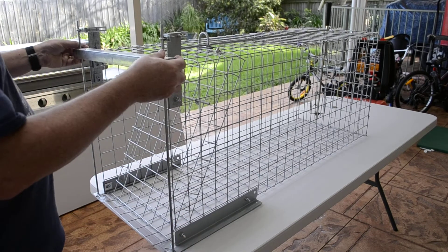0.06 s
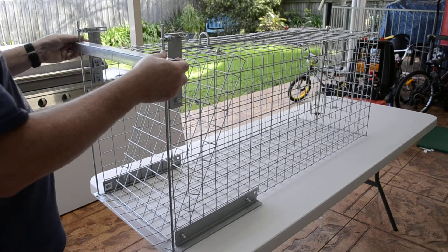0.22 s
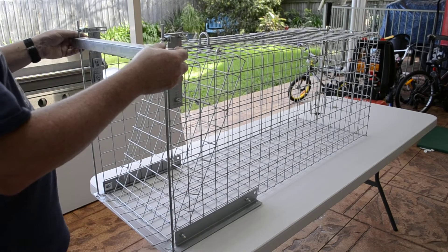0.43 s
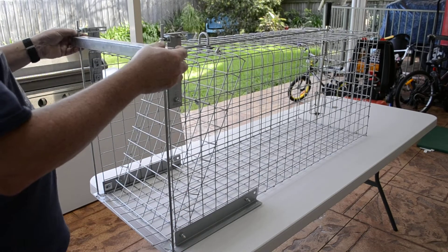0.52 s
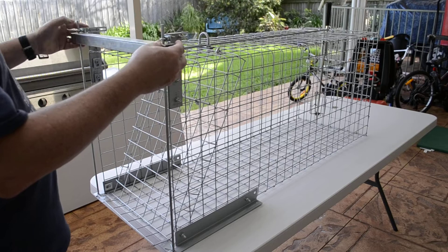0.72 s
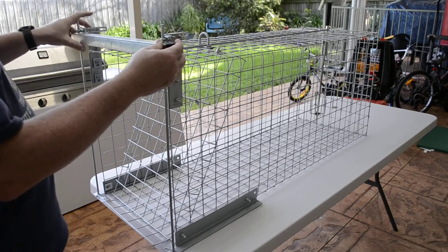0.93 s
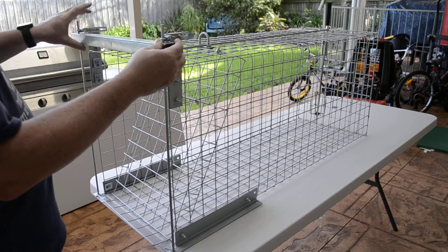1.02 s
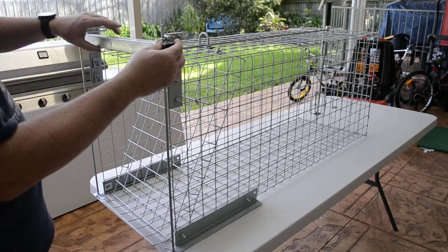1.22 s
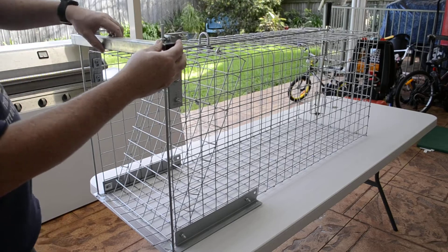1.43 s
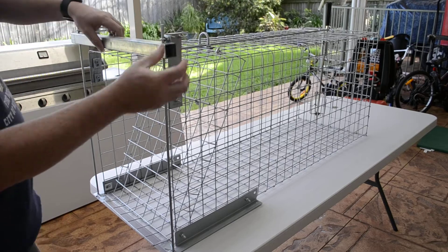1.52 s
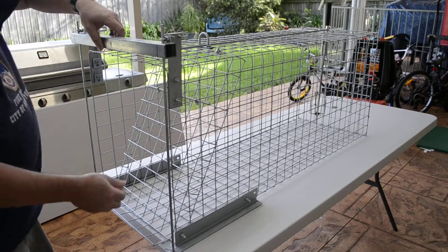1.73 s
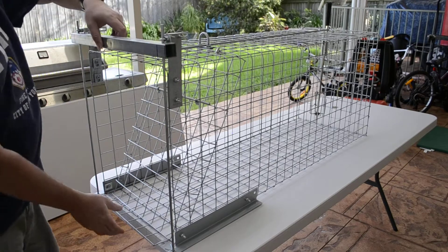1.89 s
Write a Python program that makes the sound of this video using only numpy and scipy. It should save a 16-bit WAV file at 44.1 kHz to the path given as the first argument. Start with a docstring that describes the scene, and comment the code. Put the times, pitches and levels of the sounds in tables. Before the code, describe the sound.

A metal bar clinks against a wire cage at about 0.2 seconds and scrapes along its frame in short pushes. At 0.6 seconds it seats with a hard clack, and the mesh rattles and rings briefly. A light tick and scrape come near 0.9 seconds, a softer second clack at 1.5, and a faint scrape near 1.9. The handling is close, over a soft outdoor rush.

```python
"""Under a patio roof, one microphone near a wire cage. A metal bar is slid into the door frame:
it clinks on a bracket, scrapes along and seats with two hard clacks that set frame and mesh ringing.
Handling adds small ticks, and the friction draws a faint boom from the table under the cage.
Farther off lie a soft outdoor rush, a low drone and one thin, high bird note."""
import sys
import numpy as np
from scipy import signal
from scipy.fft import rfft, irfft, next_fast_len
from scipy.io import wavfile
from scipy.ndimage import map_coordinates

SR = 44100
rng = np.random.default_rng(int(sys.argv[2]) if len(sys.argv) > 2 else 0)


def unload_audio(sound):
    """Save the sound as a 16-bit wav file, at the path given as the first command line argument."""
    columns = np.transpose(np.atleast_2d(sound))
    # keep every value between -1 and 1, then stretch to whole-number steps
    steps = np.round(np.clip(columns, -1, 1) * 32767)
    wavfile.write(sys.argv[1], SR, steps.astype(np.int16))


N = 85995

# the bar seats: start_s, mesh_db, crack_db, ring_db, struck_end (0 near, 1 far), mesh_tilt_db_per_octave
SEATINGS = [(.5832, -30, -25.3, -37.3, 0, 0), (1.5192, -35, -31, -43, 1, -.5)]
# contacts within one clack: delay_s, level_db
CLACK_CONTACTS = [(0, -3), (.0062, -2)]
# crack of the bar landing: frequency_hz, density_db
CRACK_SPECTRUM = [(60, -35), (150, -14), (520, 0), (1300, -2), (2300, -2), (3300, -6), (4400, 0),
                  (5900, -6), (7100, -1), (7850, -9), (9300, 1), (10500, -4), (11300, -13), (14000, -55)]
# modes of bar and frame, by the end struck: pitch_hz, near_end_db, far_end_db
FRAME_MODES = [(236, -6, -9), (289, -7, -2), (478, -6, -1), (531, -4, -4), (596, -4, -13), (742, -4, -2),
               (1183, -4, 3), (1262, 1, 0), (1609, -5, -9), (2152, 0, -16), (2276, -6, -9), (2328, -5, -5),
               (2825, -2, -4), (2916, -6, 0), (3909, -8, -7), (4177, -7, -7), (4405, 5, -1),
               (4958, -9, -18), (5150, -3, -10), (5345, -1, -6), (5620, -6, -4), (5891, -6, -15),
               (6414, -9, -6), (6504, -9, -9), (7102, -6, -5), (7576, -11, -11), (8153, -9, -22),
               (8247, -12, -20), (8312, -15, -13), (8549, -14, -19), (8874, -9, -25), (9122, -9, -18),
               (9220, -11, -16), (10384, -16, -19)]
# ring time of bar and frame: frequency_hz, t60_s
FRAME_DECAY = [(130, 0.37), (500, 0.69), (1200, 0.47), (3000, 0.6), (5000, 0.32), (10000, 0.41)]
# dense ringing of the mesh: frequency_hz, density_db
MESH_SPECTRUM = [(35, -84), (60, -74), (121, -2.5), (161, -21.5), (238, -5.5), (421, -10.5), (597, -1),
                 (637, -9), (759, -2.5), (1010, -5.5), (1200, -1), (1400, -5.5), (2120, -7), (3590, -9),
                 (4370, -5.5), (4770, -13), (5210, -11), (9200, -19), (11200, -24), (14600, -65),
                 (22000, -120)]
# ring time of the mesh: frequency_hz, t60_s
MESH_DECAY = [(130, 1.0), (500, 0.71), (1200, 0.79), (3000, 0.73), (5000, 0.59), (10000, 0.41)]
# light touches on the bracket: start_s, crack_db, ring_db, mesh_db, pitch_ratio, ring_tilt_db_per_octave
TOUCHES = [(-.01, -64, -53, -55, 1, -10), (.212, -51, -62, -54, 1, -3), (.2262, -33.5, -36.5, -46, 1, 0),
           (.268, -47, -54, -46, 1, -6), (.413, -47, -51, -54, .975, -8), (.858, -50, -49, -55, 1.06, -14),
           (1.336, -59, -76, -70, 1, -4)]
# modes of the bracket: pitch_hz, level_db, t60_s
BRACKET_MODES = [(4391, -7, .35), (4453, 0, .2), (4518, 0, .17), (4635, -3, .13), (5247, -12, .35),
                 (5366, -14, .35), (6210, -17, .38), (6877, -17, .27), (7281, -18, .27), (8136, -6, .2),
                 (8716, -12, .2), (9184, -6, .18), (9553, -6, .17), (9925, -7, .13)]
# crack of a light touch: frequency_hz, density_db
CLINK_SPECTRUM = [(200, -12), (900, -7), (2300, -7), (3700, -4), (4500, -6.5), (5800, -22), (7000, -5.5),
                  (7800, -16), (8300, -8.5), (9700, -5.5), (11200, -15.5), (14000, -57)]
# the bar slides: start_s, end_s, level_db, release_t60_s, relative_rasp_db, relative_boom_db
PUSHES = [(-.03, 0.05, -54.5, 1, -74, -7.5), (0.261, 0.305, -43, 0.74, -11, -18),
          (0.376, 0.481, -51, 0.48, -17, -7.5), (0.507, 0.59, -55.5, 0.51, -7.5, -13),
          (0.844, 0.935, -52.5, 0.64, -20, -15), (1.417, 1.452, -55.5, 0.72, -26, -20),
          (1.858, 1.912, -55, 0.55, -15, -26)]
# body of the scrape: frequency_hz, density_db
SCRAPE_SPECTRUM = [(47, -42), (80, -42), (118, -20), (355, 0), (536, 0.5), (607, -3), (1200, -2),
                   (2630, -8), (4150, -11.5), (4510, -13), (5660, -21.5), (9490, -31.5), (11200, -50.5),
                   (14600, -73), (22000, -120)]
# bright rasp of metal on metal: frequency_hz, density_db
RASP_SPECTRUM = [(1500, -18), (4400, -3.5), (5800, -7), (7900, -8.5), (9500, -3), (11200, -14),
                 (14000, -50)]
# outdoor rush beyond the patio: frequency_hz, density_db
RUSH_SPECTRUM = [(25, -14), (60, -12), (130, -2), (220, -4), (600, -1), (950, 0), (1400, -5), (2200, -13),
                 (2950, -12), (4500, -19), (6000, -28), (7900, -35), (9500, -29), (11200, -39),
                 (14000, -70)]


def clacks(crack_t60_s=.085, rattle_db=1.37, rattle_per_s=110):
    """The bar lands in a quick run of contacts: rattling mesh, a crack and the frame's ring."""
    out = np.zeros(N)
    for start_s, mesh_db, crack_db, ring_db, far_end, tilt_db in SEATINGS:
        modes = [(hz, far_db if far_end else near_db, curve_at(FRAME_DECAY, hz))
                 for hz, near_db, far_db in FRAME_MODES]
        rattle = amp(mesh_db + rattle_db * wobble(rattle_per_s))
        out += rattle * mesh_ring(start_s, CLACK_CONTACTS, tilt_db)
        crack = coloured_noise(CRACK_SPECTRUM, FRAME_MODES, peak_db=5, width_hz=60)
        out += amp(crack_db) * strike(crack, start_s, CLACK_CONTACTS, crack_t60_s)
        out += amp(ring_db) * metal_ring(modes, start_s, CLACK_CONTACTS)
    return out


def metal_ring(modes, start_s, contacts, flutter_db=1.5, flutter_rad=.45):
    """Struck metal rings down; loose joints make each mode flutter in strength and phase."""
    t, tone = np.arange(SR) / SR, np.zeros(N)
    flutter = lambda: np.interp(t, np.arange(91) / 90, rng.standard_normal(91))
    for hz, db, t60_s in modes:
        envelope = amp(db + flutter_db * flutter() - 60 * t / t60_s)
        phase = 2 * np.pi * (hz * t + rng.random()) + flutter_rad * flutter()
        tone[:SR] += envelope * np.sin(phase)
    return strike(tone, start_s, contacts)


def mesh_ring(start_s, contacts, tilt_db):
    """Countless wire modes and their echo under the roof blur into noise; the treble dies first."""
    hz, t, bands = signal.stft(coloured_noise(MESH_SPECTRUM), SR, nperseg=512)
    octaves = np.log2((hz[:, None] + 100) / 1000)
    decay_db = 60 * t / curve_at(MESH_DECAY, hz)[:, None]
    _, wires = signal.istft(bands * amp(tilt_db * octaves - decay_db), SR, nperseg=512)
    return strike(wires[:N], start_s, contacts)


def clinks(crack_t60_s=.16, mesh_tilt_db=-4.7):
    """Light touches ring the small bracket and barely stir the mesh."""
    out, one_contact = np.zeros(N), [(0, .012)]
    lowest_hz = BRACKET_MODES[0][0]
    for start_s, crack_db, ring_db, mesh_db, pitch_ratio, tilt_db in TOUCHES:
        modes = [(hz * pitch_ratio, db + tilt_db * np.log2(hz / lowest_hz), t60_s)
                 for hz, db, t60_s in BRACKET_MODES]
        crack = coloured_noise(CLINK_SPECTRUM, modes, width_hz=70)
        out += amp(crack_db) * strike(crack, start_s, one_contact, crack_t60_s)
        out += amp(ring_db) * metal_ring(modes, start_s, one_contact)
        out += amp(mesh_db) * mesh_ring(start_s, one_contact, mesh_tilt_db)
    return out


def slides(rise_s=.018, slips_per_s=120, roughness_db=1.5):
    """The bar's uneven friction stirs the frame, rasps on the bracket and makes the table boom."""
    t, out = np.arange(N) / SR, np.zeros(N)
    slips = amp(roughness_db * wobble(slips_per_s))
    scrape = coloured_noise(SCRAPE_SPECTRUM, FRAME_MODES, width_hz=26.5)
    rasp = coloured_noise(RASP_SPECTRUM, BRACKET_MODES, peak_db=12, width_hz=47)
    boom = noise_band(centre_hz=135, width_hz=16)
    for start_s, end_s, db, t60_s, rasp_db, boom_db in PUSHES:
        rise = np.clip((t - start_s) / rise_s, 0, 1)
        release = amp(-60 * np.maximum(t - end_s, 0) / t60_s)
        friction = slips * (scrape + amp(rasp_db) * rasp)
        out += amp(db) * rise * release * (friction + amp(boom_db) * boom)
    return out


def bird(peak_s=1.283, fade_s=.022, pitch_hz=9190, rise_hz_per_s=500, waver_hz=25, level_db=-69):
    """Off in the background, one thin note wavers and rises slightly."""
    t = np.arange(N) / SR - peak_s
    hz = pitch_hz + rise_hz_per_s * t + waver_hz * wobble(80)
    envelope = amp(level_db) / np.cosh(t / fade_s)
    return envelope * np.sin(2 * np.pi * np.cumsum(hz) / SR)


def outdoors(rush_db=-56.5, swell_db=-2.7, drone_db=-72):
    """Beyond the patio, a soft rush wavers in level over a low drone."""
    rush = amp(rush_db + swell_db * wobble(12)) * coloured_noise(RUSH_SPECTRUM)
    drone = amp(drone_db) * noise_band(centre_hz=134, width_hz=8)
    return rush + drone


def strike(x, start_s, contacts, t60_s=np.inf, attack_s=.0004):
    """Start x at start_s; each contact adds energy, which dies away if t60_s is given."""
    samples, power = np.arange(N), np.zeros(N)
    for delay_s, db in contacts:
        age_s = np.maximum(samples / SR - delay_s, 0)
        attack = 1 - np.exp(-age_s / attack_s)
        power += attack * amp(db - 60 * age_s / t60_s) ** 2
    return np.interp(samples - round(start_s * SR), samples, x * np.sqrt(power), left=0, right=0)


def coloured_noise(spectrum, modes=(), peak_db=0, width_hz=1):
    """Noise of rms 1; each mode adds a resonance on top of the spectrum under it, the added peak being peak_db
    relative to that spectrum (so peak_db=0 doubles the level at the mode, and nearby peaks add further)."""
    def response(hz):
        peaks = sum(1 / (1 + (2 * (hz - mode[0]) / width_hz) ** 2) for mode in modes)
        return amp(curve_at(spectrum, hz)) * (1 + amp(peak_db) * peaks)
    return unit_rms(filtered(rng.standard_normal(N), response))


def noise_band(centre_hz, width_hz):
    """A narrow band of noise of rms 1."""
    band = lambda hz: 1 / (1 + (2 * (hz - centre_hz) / width_hz) ** 4)
    return unit_rms(filtered(rng.standard_normal(N), band))


def filtered(x, response):
    """Weight the spectrum of x by the gain response(hz)."""
    size = next_fast_len(N + 8192)
    return irfft(rfft(x, size) * response(np.fft.rfftfreq(size, 1 / SR)), size)[:N]


def wobble(knots_per_s):
    """A smooth random curve."""
    return map_coordinates(rng.standard_normal(N // 20), [np.arange(N) * knots_per_s / SR], mode="wrap")


def curve_at(points, hz):
    """Read (frequency_hz, value) points on a log frequency axis."""
    knots_hz, values = np.transpose(points)
    return np.interp(np.log(hz + 1), np.log(knots_hz + 1), values)


def amp(db):
    """Decibels to gain."""
    return 10 ** (np.asarray(db) / 20)


def unit_rms(x):
    """Scale to rms 1."""
    return x / np.sqrt(np.mean(x ** 2) + 1e-20)


def scene():
    """The cage in front, bird and open air behind, all at one microphone."""
    return (clacks() + clinks() + slides() + bird() + outdoors())[None]


def record(dry, low_cut_hz=94, top_hz=11300):
    """The microphone chain cuts the deep bass and falls off steeply above its band limit."""
    low_cut = signal.butter(2, low_cut_hz, btype="high", fs=SR, output="sos")
    band_limit = lambda hz: 1 / np.sqrt(1 + (hz / top_hz) ** 120)
    return np.array([filtered(channel, band_limit) for channel in signal.sosfilt(low_cut, dry)])


dry = scene()
out = record(dry)
unload_audio(out)
```